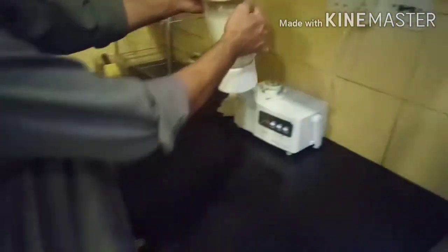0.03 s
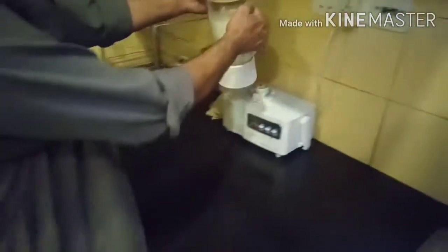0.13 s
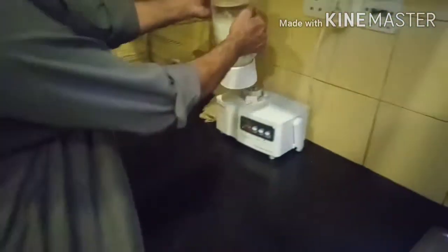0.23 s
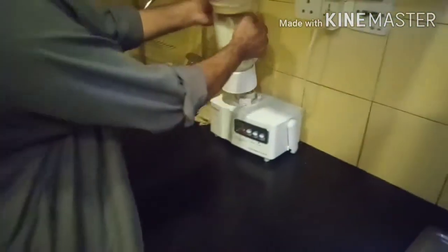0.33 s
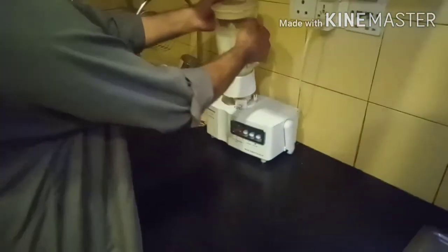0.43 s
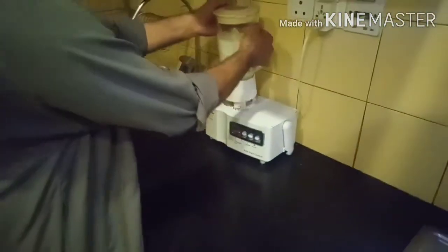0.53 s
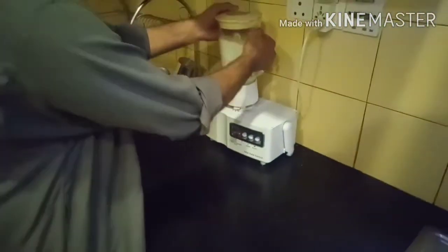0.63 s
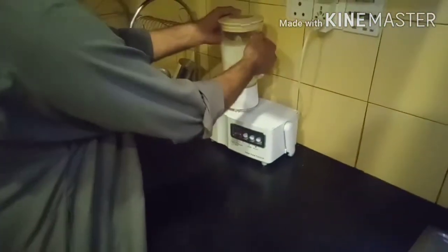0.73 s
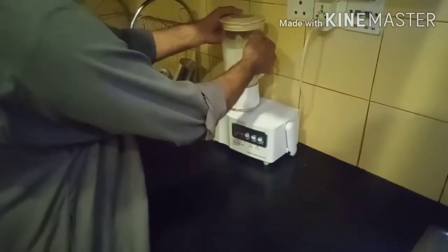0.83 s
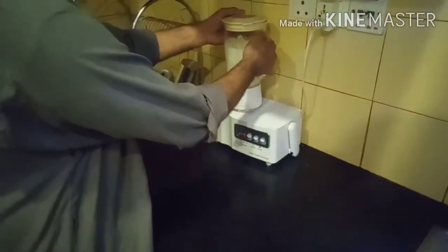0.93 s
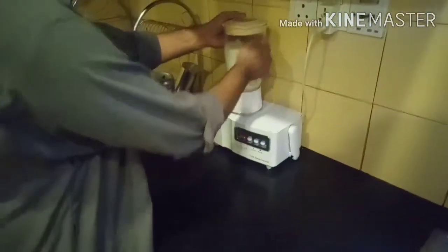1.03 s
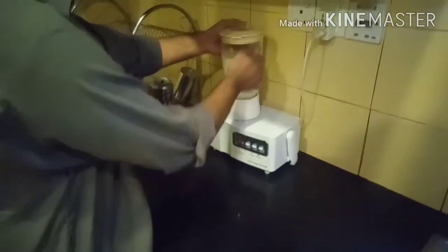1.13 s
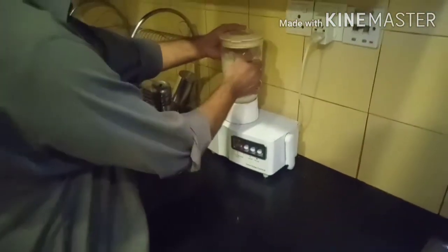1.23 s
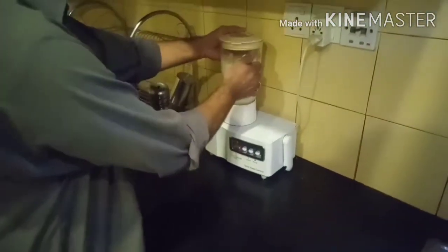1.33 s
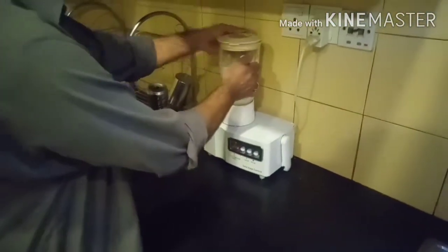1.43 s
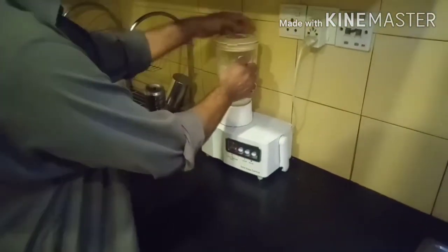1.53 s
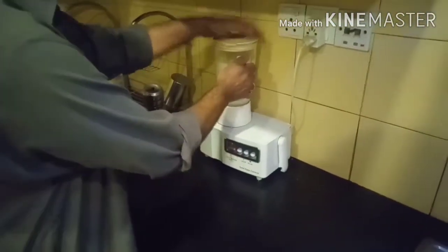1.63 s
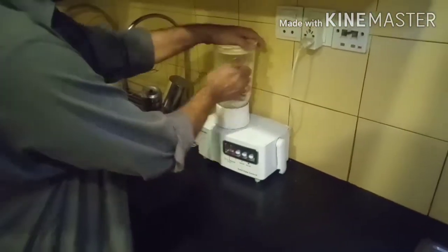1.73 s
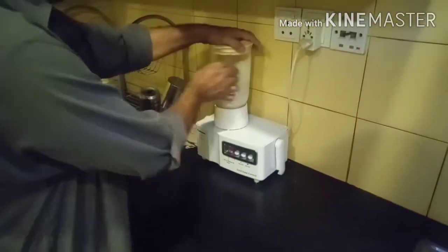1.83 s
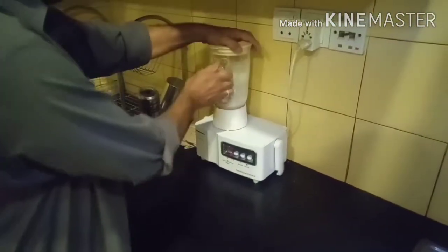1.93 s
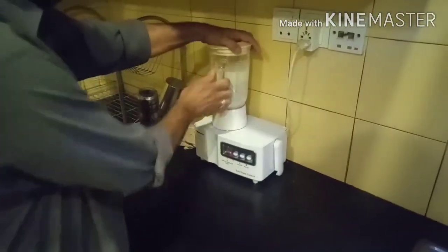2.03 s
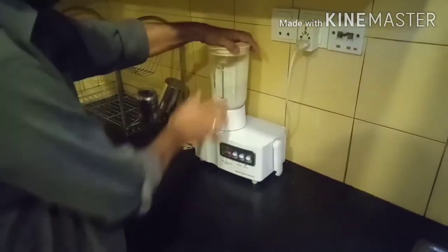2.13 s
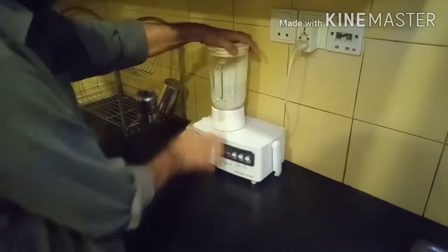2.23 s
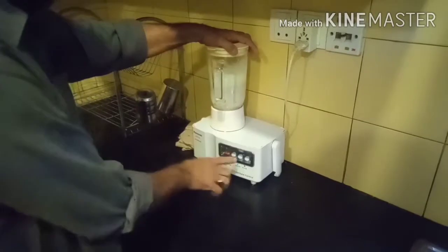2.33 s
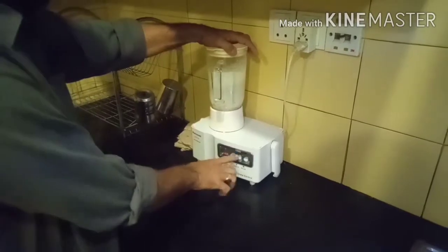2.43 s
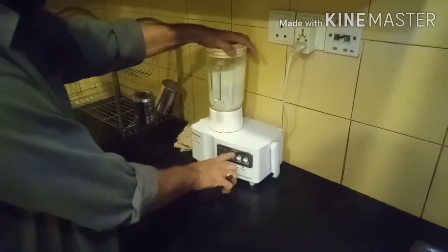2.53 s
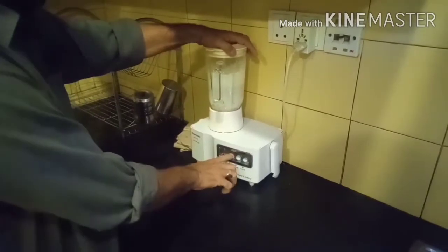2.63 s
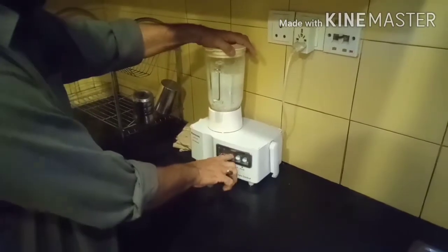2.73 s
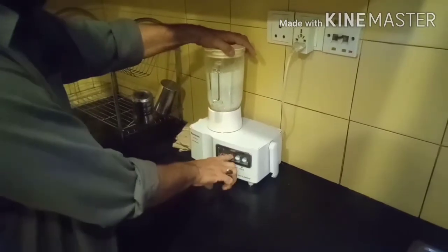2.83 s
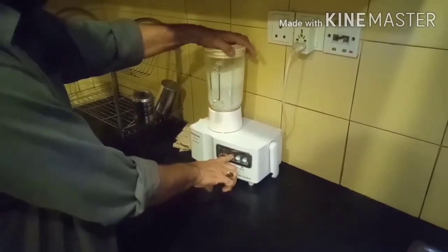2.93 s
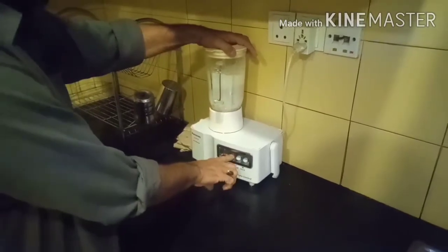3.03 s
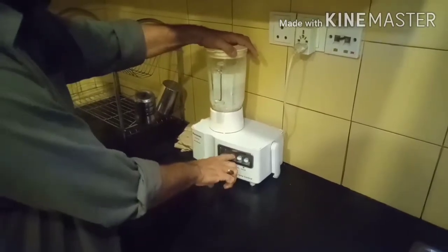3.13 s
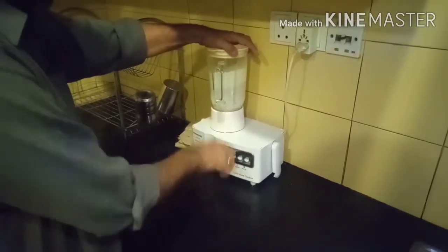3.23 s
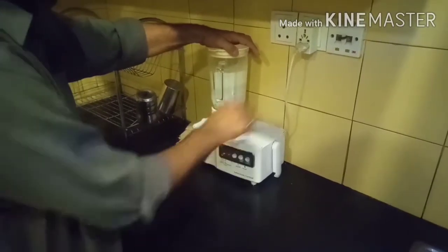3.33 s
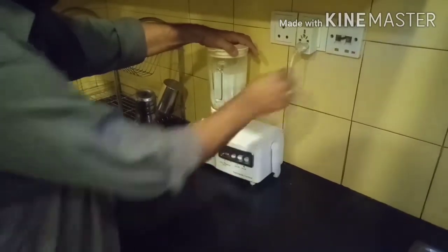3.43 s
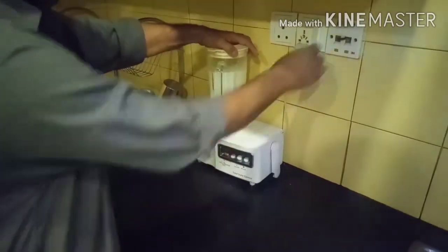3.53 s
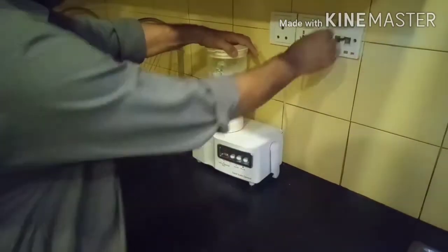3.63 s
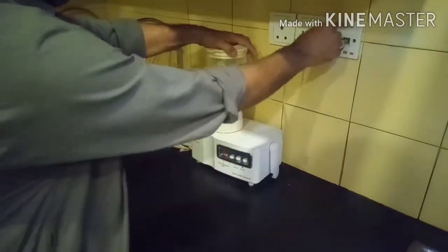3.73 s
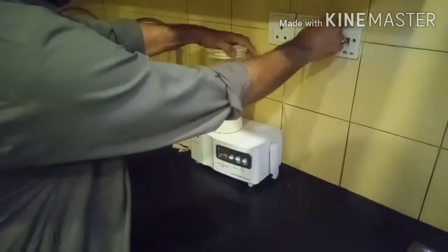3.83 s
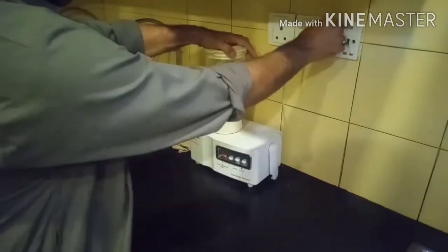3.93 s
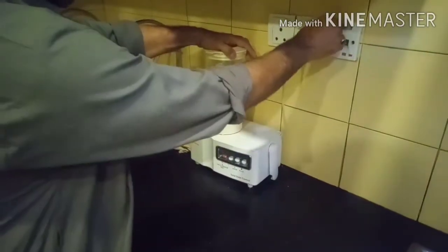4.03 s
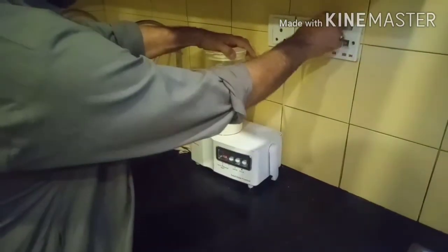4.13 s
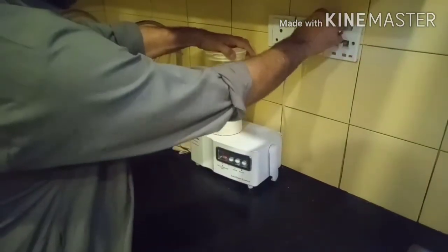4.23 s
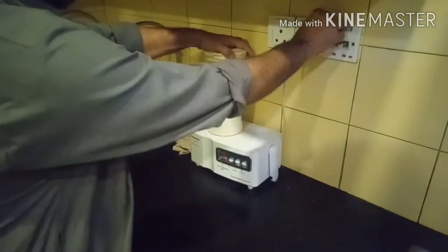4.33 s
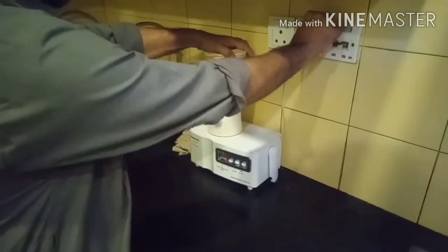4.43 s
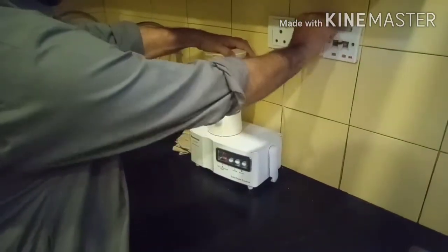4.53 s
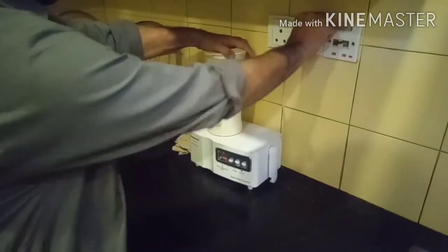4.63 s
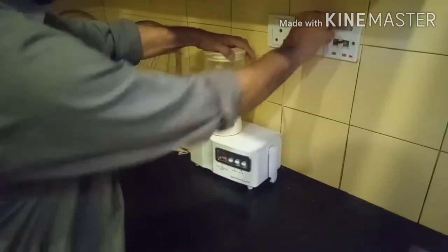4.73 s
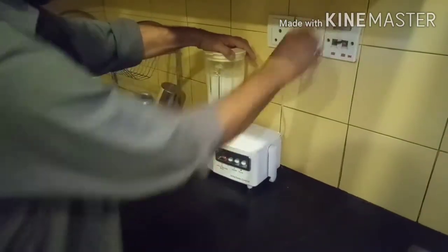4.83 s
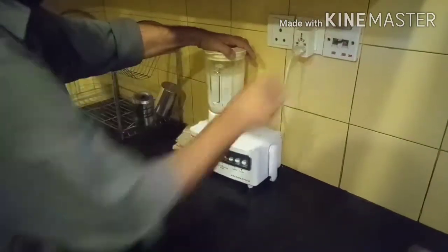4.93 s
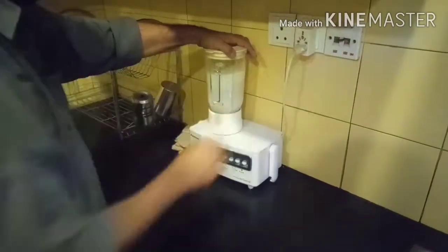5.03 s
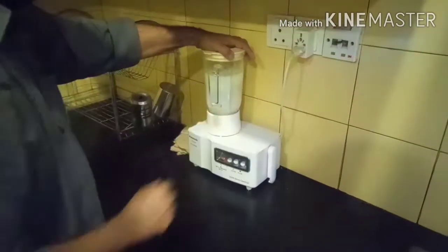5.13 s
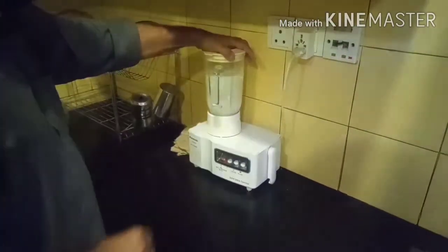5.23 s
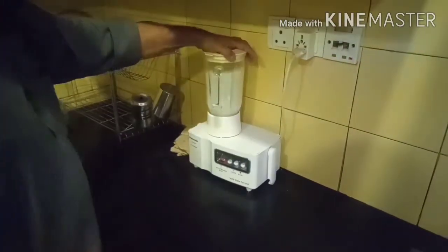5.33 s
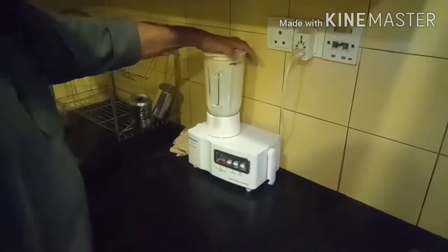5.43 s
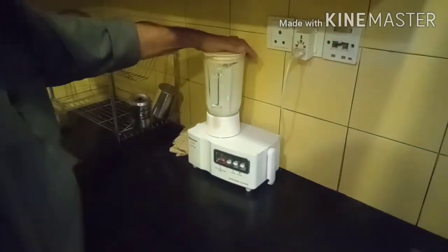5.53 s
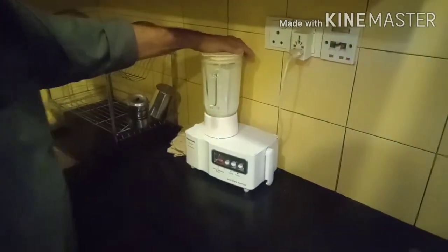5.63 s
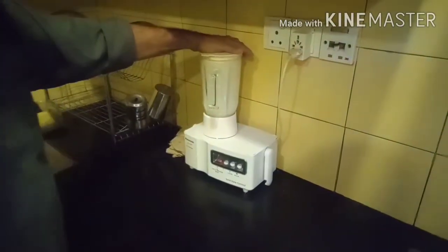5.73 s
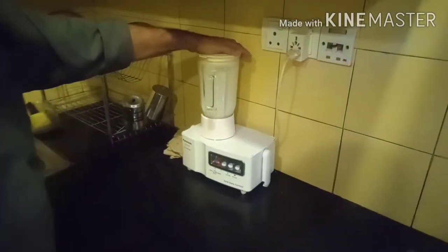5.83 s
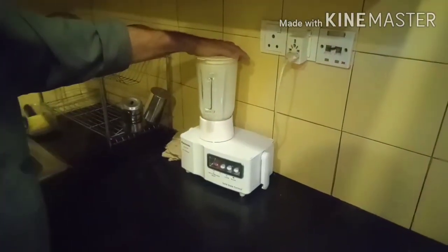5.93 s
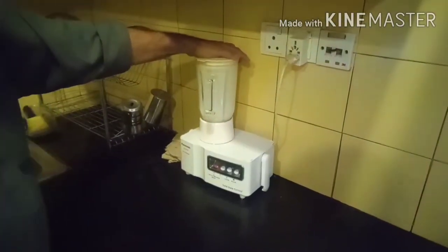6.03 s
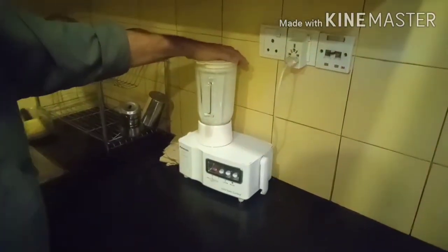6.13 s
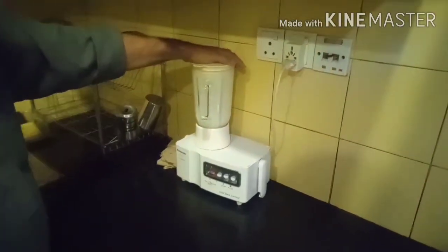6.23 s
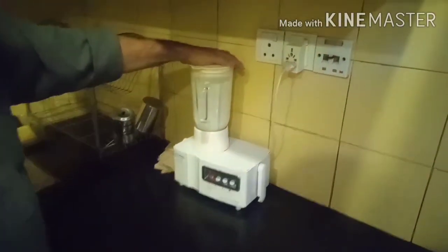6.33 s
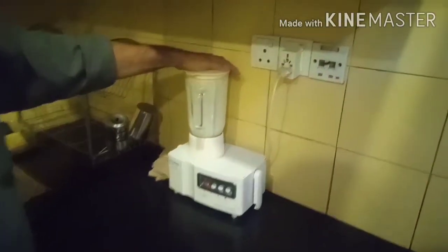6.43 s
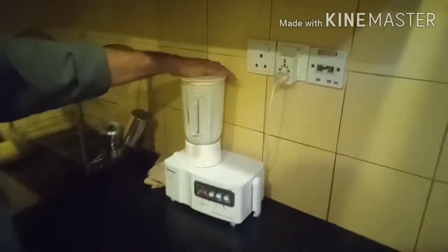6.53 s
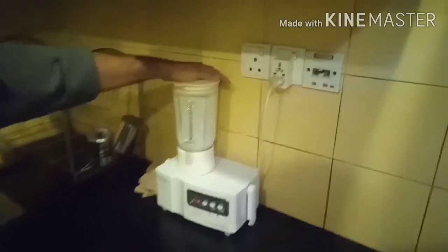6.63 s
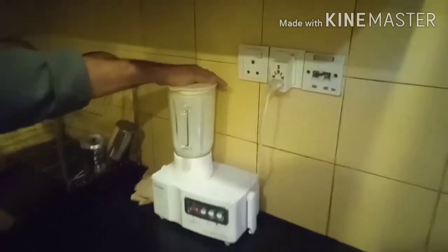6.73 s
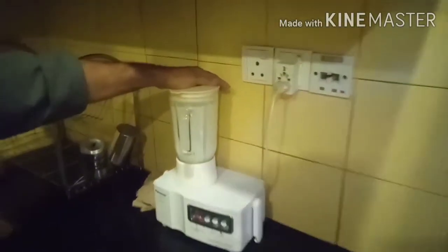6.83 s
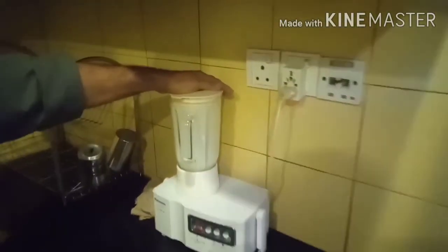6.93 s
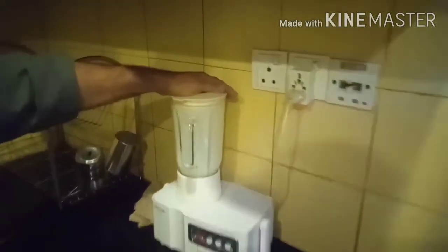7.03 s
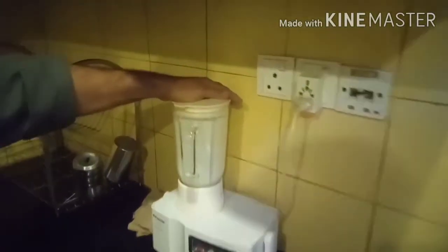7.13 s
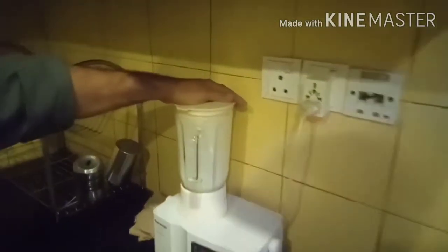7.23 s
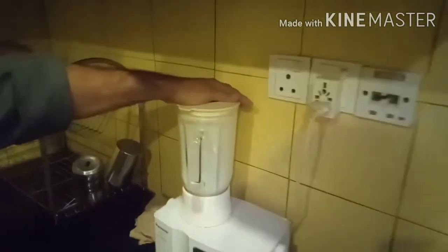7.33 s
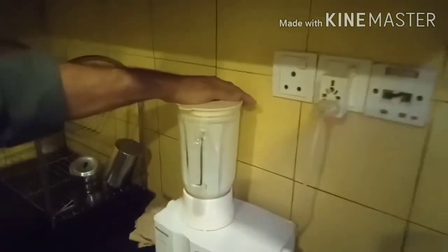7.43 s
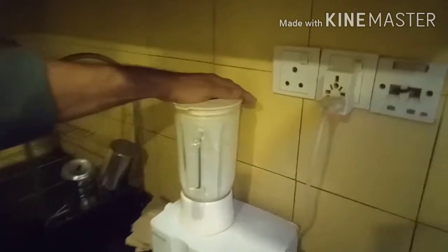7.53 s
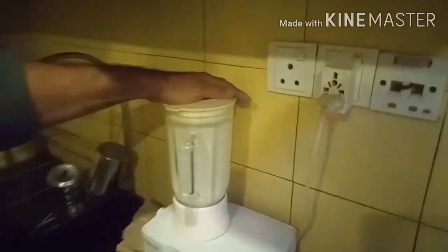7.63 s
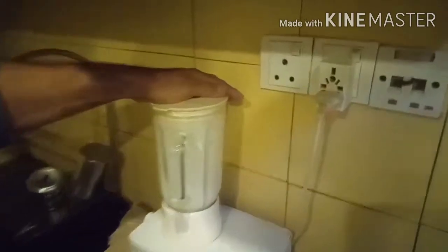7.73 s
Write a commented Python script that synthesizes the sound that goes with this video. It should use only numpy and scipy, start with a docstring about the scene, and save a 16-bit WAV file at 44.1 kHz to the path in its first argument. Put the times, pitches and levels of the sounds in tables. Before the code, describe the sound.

After a few plastic knocks and clicks in a small kitchen, a blender snaps on and runs with a humming, churning roar.

```python
"""A small tiled kitchen. A plastic blender jar is twisted onto its base and chatters home;
speed buttons click, then the wall switch snaps. The mains motor starts at once: its housing
roars and hums, its brushes crackle in step with the mains and then settle, and the blades churn
a wet mix whose hiss climbs as it thins. The walls answer briefly over a faint, steady room tone."""
import sys
import numpy as np
from scipy import signal
from scipy.fft import rfft, irfft, next_fast_len
from scipy.io import wavfile
from scipy.ndimage import map_coordinates

SR = 44100
rng = np.random.default_rng(int(sys.argv[2]) if len(sys.argv) > 2 else 0)


def waveform_to_disk(signal):
    """Save audio, clipped to [-1, 1], as 16-bit WAV at the path in sys.argv[1]."""
    frames = np.transpose(np.atleast_2d(signal))
    scaled = np.clip(frames, -1, 1) * 32767
    samples = np.round(scaled).astype(np.int16)
    wavfile.write(sys.argv[1], SR, samples)


N = 342657
MAINS_HZ, MOTOR_START_S = 50, 4.538

# The drag of the mix, heard as roar. Each row: time in seconds, load in dB (-29 is usual).
LOAD = [(4.55, -29.5), (4.65, -26), (4.8, -28.5), (5.6, -28), (5.85, -31.5), (6.08, -28), (6.28, -34),
        (6.4, -32.5), (6.55, -34.5), (6.85, -34.5), (6.95, -29.5), (7.35, -27.5), (7.55, -29.5),
        (7.77, -26.5)]
# How hard the blades whip, heard as hiss. Each row: time in seconds, churn in dB (-21 is usual).
CHURN = [(4.55, -24.5), (4.68, -24.5), (5.08, -27), (5.2, -24), (5.4, -24), (5.5, -20), (5.9, -21),
         (6.04, -20), (6.22, -22), (6.85, -21.5), (7.3, -20), (7.77, -19)]
# The vortex opening. Each row: time in seconds, roar centre in Hz, hiss centre in Hz.
VORTEX = [(4.55, 803, 3370), (5.3, 820, 3320), (5.6, 826, 3980), (6.1, 850, 4330), (6.9, 850, 4200),
          (7.4, 735, 3700), (7.77, 700, 4060)]
def blender():
    """Motor, brushes and blades ride a shifting load."""
    load_db = curves(LOAD)[0] + 29
    churn_db = curves(CHURN)[0] + 21
    roar_hz, hiss_hz = curves(VORTEX)
    drive = motor(load_db, churn_db, roar_hz) + brushes(load_db)
    return spin_up() * (drive + blades(load_db, churn_db, hiss_hz))

def spin_up():
    """The motor's sound fades in a moment after the switch closes."""
    return 1 - np.exp(-np.maximum(clock() - MOTOR_START_S, 0) / 0.0091)

# Tone of the low rumble and the housing's roar. Each row: frequency in Hz, EQ gain in dB.
RUMBLE_EQ = [(25, -45), (55, -17), (85, -21), (125, -12), (160, -5), (220, -7), (255, 0.5), (285, -1),
             (325, -9.5), (430, -10.5), (700, -35)]
HOUSING_EQ = [(300, -27), (440, -13.5), (540, -4), (595, -5), (675, 1), (710, -3), (760, 2), (795, -6.5),
              (840, -2), (950, -2), (1050, -6), (1300, -16.5), (2000, -52)]
def motor(load_db, churn_db, roar_hz):
    """The motor shakes its housing, louder under load."""
    rumble = amp(-40 + .2 * churn_db) * coloured(noise(), RUMBLE_EQ)
    shaking = coloured(noise() * amp(2.04 * wobble(120)), HOUSING_EQ)
    return rumble + amp(-29.5 + load_db) * swept(shaking, roar_hz, lift_db=7, octaves=0.17)

# Tone of the wet slosh and the grit. Each row: frequency in Hz, EQ gain in dB.
SLOSH_EQ = [(250, -38), (900, -11.5), (1240, 2), (1440, -3), (1590, -6.5), (1720, -3), (1860, 1.5),
            (2180, 2), (2330, -1.5), (2900, 2.5), (4000, -15), (7000, -44)]
GRIT_EQ = [(900, -40), (2400, -14), (2900, -4), (3700, 2), (4150, -2), (4400, 2), (4600, -6.5), (5350, -5),
           (5850, -10.5), (6250, -8), (7300, -10), (8800, -20), (12500, -32), (15500, -47)]
def blades(load_db, churn_db, hiss_hz, bits_per_s=48):
    """Dense tiny impacts in the mix hiss and slosh, while hard bits are flung at the jar."""
    surge = amp(wobble(60) + 0.89 * wobble(260))
    liquid = noise() * amp(0.46 * wobble(150)) * np.sqrt(surge)
    slosh = amp(-29.5 + .5 * load_db) * coloured(liquid, SLOSH_EQ)
    bits = unit((rng.random(N) < bits_per_s / SR) * (2 * rng.random(N) - 1))
    grit = coloured(noise() * amp(wobble(1000)) * surge + amp(-21) * bits, GRIT_EQ)
    hiss = amp(-22 + churn_db + lumps()) * swept(grit, hiss_hz, lift_db=5.5, octaves=0.42)
    return slosh + hiss + jar_rings() * surge

# Lumps caught by the blades. Each row: time in seconds, length in seconds, nominal lift in dB.
LUMPS = [(5.138, 0.011, 6), (5.167, .04, 5), (5.281, 0.014, 5), (5.34, .012, 6), (5.564, 0.04, 2.5)]
def lumps():
    """Each lump lifts the hiss at once and is ground away; in dB."""
    return sum(db * turn(s, .002) * bell(s, length_s) for s, length_s, db in LUMPS)

# Resonances of jar and housing. Each row: pitch in Hz, width in Hz, level in dB with a lumpy mix,
# level in dB with a smooth mix, time of the change in seconds.
JAR_RINGS = [(255, 50, -50.5, -42.5, 6.8), (752, 71, -44.5, -39, 6.97), (1583, 74, -39.5, -50.5, 6.28),
             (2543, 53, -36, -46, 5.57), (3750, 130, -41.5, -36, 6.1), (3930, 45, -51, -33, 6.34),
             (4360, 80, -42, -31.5, 6.06), (4756, 120, -46, -35, 5.24), (5120, 140, -52, -35, 5.7),
             (5400, 260, -49, -29.5, 7.16), (6150, 100, -52, -38, 6.26), (6900, 79, -43, -55, 6.1)]
def jar_rings():
    """The resonances swell at random; one after another they come or go as the mix thins."""
    out = np.zeros(N)
    for hz, width, lumpy_db, smooth_db, s in JAR_RINGS:
        level_db = lumpy_db + (smooth_db - lumpy_db) * turn(s, 0.065)
        out += amp(level_db + 2.2 * wobble(7)) * narrow(hz, width)
    return out

# Tone of sparking and of settled brushes. Each row: frequency in Hz, EQ gain in dB.
CRACKLE_EQ = [(700, -39), (4000, 0), (5800, -8), (6500, 2.5), (7000, 3.5), (7700, -4), (8800, -13),
              (10000, -10.5), (11000, -8), (12000, -13.5), (13500, -16), (15500, -28)]
GLIDE_EQ = [(6000, -20), (8500, 3), (9200, -5), (10000, -1), (10800, -2), (12600, 8), (14000, -10),
            (15500, -15)]
def brushes(load_db):
    """The brushes spark and crackle at first, then settle to a mostly smooth hiss."""
    settled = turn(s=6.14, span_s=.025)
    flare = unit(0.44 + sparks(scatter_db=8, jitter_s=.0007, life_s=0.004))
    sparking = amp(-29.5 + 0.27 * wobble(10)) * (1 - .9 * settled)
    crackle = sparking * coloured(noise() * flare, CRACKLE_EQ)
    gliding = amp(-50) * settled * coloured(noise(), GLIDE_EQ)
    return amp(0.45 * load_db) * (crackle + gliding)

def sparks(scatter_db, jitter_s, life_s):
    """Brush sparks flare at each crest of the mains current, each at its own strength."""
    crests = np.arange(0, N / SR, 1 / (2 * MAINS_HZ))
    late, size = rng.uniform(-1.3, 1, (len(crests), 2)).T
    at = np.clip((crests + jitter_s * late) * SR, 0, N - 1).astype(int)
    flares = np.bincount(at, amp(scatter_db * size), N)
    return unit(signal.lfilter([1], [1, -np.exp(-1 / (life_s * SR))], flares))

# The hum's partials. Each row: multiple of the mains frequency, level in dB.
MOTOR_HUM = [(2, -46), (3, -48.5), (4, -60), (5, -54)]
def hum():
    """The motor's iron vibrates at multiples of the mains."""
    return sum(amp(db + 1.5 * wobble(5.2)) * np.sin(2 * np.pi * (k * MAINS_HZ * clock() + rng.random()))
               for k, db in MOTOR_HUM)

# Jar against base. Each row: start in seconds, strength in dB, body offset in dB,
# treble offset in dB, chatter length in seconds.
KNOCKS = [(0.6724, -37, -11, -5, .004), (0.6893, -30, -19, -17, .004), (0.7544, -27, -5, -15, .004),
          (0.7654, -26, -1.5, -7, 0.0051), (0.7931, -26, -4, -15, .004), (0.8255, -31, -7, -13, .004),
          (1.112, -31, -9, -5.5, 0.0073), (1.1273, -33, -15, -14, .004), (1.1544, -27, -11, -19, .004),
          (1.1626, -20.5, -4.5, -17, 0.0089), (1.1802, -17, -4.5, -13, 0.016), (1.2074, -24, 0, -16, .006),
          (1.2304, -25, -2, -11, 0.0096), (1.7504, -29, -13, -13, .004), (1.792, -19.5, -6, -10.5, 0.033),
          (1.8304, -22, -5, -11, 0.013), (1.8627, -29, -4, -9, .004), (1.8881, -13, 2.5, -5.5, .015),
          (1.9124, -20.5, -1, -4, 0.026), (1.9511, -18, -6.5, -7, .044)]
# Tone of a knock. Each row: frequency in Hz, EQ gain in dB.
KNOCK_EQ = [(200, -7), (280, -7), (400, -17), (520, -7), (650, -4.5), (800, 3), (950, -3), (1150, -13),
            (1300, -8.5), (2290, -9), (3680, -7.5), (5590, -18.5), (7200, -13.5), (8400, -26.5),
            (11000, -26.5), (15500, -40)]
# The ring of jar and housing. Each row: pitch in Hz, relative level in dB, T60 in seconds.
PLASTIC_MODES = [(550, -1.5, 0.039), (677, 4, 0.071), (796, 1, 0.05), (897, 1, 0.089), (1216, -11, 0.077),
                 (1590, -10, 0.077), (1850, -7.5, 0.055), (2570, -7.5, 0.07), (2910, -12, .06),
                 (3780, -17, .06), (4420, -8, .05), (7050, -19, 0.044)]
def jar():
    """The jar knocks and chatters onto its coupling."""
    return contacts(chatter(KNOCKS), KNOCK_EQ, PLASTIC_MODES, attack_s=0.00033,
                    band_t60_s=(0.051, 0.066, 0.038), band_db=(-2.5, -5.5, -0.5), ring_db=-10.5)

def chatter(knocks, count=5, gap_s=.0083, fall_db=11):
    """Each knock skips on in quick contacts that hold their strength, then die away."""
    hits = []
    for s, db, body_db, treble_db, length_s in knocks:
        gaps = gap_s * np.exp(.1 * rng.standard_normal(count))
        for delay in np.cumsum(gaps) - gaps[0]:
            loss_db = min(fall_db * (delay / length_s) ** 3, 80)
            hits.append((s + delay, db - loss_db, body_db, treble_db))
    return hits

def contacts(hits, eq, modes, attack_s, band_t60_s, band_db, ring_db):
    """Hard plastic contacts: a crack that dies faster in the treble, and the struck part's short ring."""
    out, t = np.zeros(N), np.arange(SR // 4) / SR
    hz, mode_db, mode_t60 = np.transpose(modes)
    partials = np.sin(2 * np.pi * hz[:, None] * t) * decay(t, mode_t60[:, None])
    bands_hz = [(220, 1300), (1300, 6000), (6000, 16000)]  # body, mid, treble
    loudest_db = max(hit[1] for hit in hits)
    for s, db, body_db, treble_db in hits:
        softness = min(amp(loudest_db - db) ** 2, 5)  # light touches slide in, hard blows snap
        rise = 1 - np.exp(-t / (attack_s * softness))
        burst = rng.standard_normal(len(t))
        gains = amp(band_db) * amp([db + body_db, db, db + treble_db])
        for (lo, hi), gain, t60 in zip(bands_hz, gains, band_t60_s):
            band = unit(filtered(burst, lambda f: amp(along(eq, f)) * (f > lo) * (f < hi)))
            add(out, s, gain * band * rise * decay(t, t60))
        weight_db = np.where(hz < bands_hz[0][1], body_db, 0)  # heavy blows reach the low modes
        strength = amp(mode_db + weight_db + 2 * rng.standard_normal(len(hz)))
        ring = (strength * rng.choice([-1, 1], len(hz))) @ partials
        add(out, s, amp(db + ring_db) * ring * rise)
    return out

# Speed buttons, then the wall switch, touched and thrown.
# Each row: start in seconds, strength in dB, body offset in dB, treble offset in dB.
BUTTONS = [(2.6938, -28, -10, -14), (2.7756, -17, -6.5, -18), (2.9437, -27.5, -10, -20),
           (3.1817, -30, -19, -21), (3.1924, -32.5, -16, -8)]
FLICKS = [(4.2722, -34, -11, -13), (4.5196, -13.5, -33, -5.5)]
# Tone of a click. Each row: frequency in Hz, EQ gain in dB.
CLICK_EQ = [(300, -29), (1220, -8), (1810, -2), (2600, 0), (3100, 0.5), (3550, 4), (4000, 1), (4600, -9.5),
            (5400, -14), (6400, -2), (7100, -10), (8700, -19), (11000, -19), (15500, -29)]
# Switch springs and plates. Each row: pitch in Hz, relative level in dB, T60 in seconds.
SWITCH_MODES = [(2520, -3, 0.05), (3500, 8, 0.038), (3890, -1, 0.053), (4600, 6, .025), (6400, -6, 0.046),
                (6970, -8, 0.037)]
def switches():
    """Dry button clicks on the housing, and the sharper snap of the wall switch."""
    buttons = contacts(BUTTONS, CLICK_EQ, PLASTIC_MODES, attack_s=.0001,
                       band_t60_s=(0.075, 0.045, 0.038), band_db=(-8, -4, -1), ring_db=-16.5)
    wall = contacts(FLICKS, CLICK_EQ, SWITCH_MODES, attack_s=.0001,
                    band_t60_s=(0.06, 0.048, 0.036), band_db=(-6, -5.5, -1), ring_db=-13)
    return buttons + wall

# Soft bumps on the counter. Each row: start in seconds, strength in dB.
BUMPS = [(0.764, -29.5), (0.904, -29), (1.065, -29), (1.179, -21.5), (1.754, -32.5), (1.798, -22),
         (1.892, -23.5)]
# The base on its feet. Each row: pitch in Hz, relative level in dB, T60 in seconds.
FEET_MODES = [(109, -12, 0.12), (212, -2.5, 0.077), (259, 0, 0.088)]
def base(thud_s=1.175, thud_rise_s=.035):
    """The base rocks on its rubber feet, and the counter thuds under the weight of the push."""
    out, t = np.zeros(N), np.arange(SR // 2) / SR
    shake = sum(amp(db) * np.sin(2 * np.pi * hz * t) * decay(t, t60) for hz, db, t60 in FEET_MODES)
    for s, db in BUMPS:
        add(out, s, amp(db) * shake * (1 - np.exp(-t / 0.0029)))
    swell = t / thud_rise_s * np.exp(1 - t / thud_rise_s)
    add(out, thud_s, amp(-43) * swell * narrow(58, 36)[:len(t)])
    return out

# Tone of the cloth. Each row: frequency in Hz, EQ gain in dB.
CLOTH_EQ = [(1500, -20), (4000, 9), (8000, 4), (12000, -5), (15500, -8)]
def sleeve():
    """A sleeve brushes past once."""
    return amp(-53) * bell(s=0.36, half_length_s=.06) * coloured(noise(), CLOTH_EQ)

# The room's decay. Each row: frequency in Hz, T60 in seconds.
KITCHEN_T60 = [(150, 0.44), (1000, 0.36), (4000, 0.28), (12000, 0.22)]
def kitchen(x):
    """The tiled walls answer with a short tail."""
    hz, t, spectra = signal.stft(rng.standard_normal(SR // 2), SR, nperseg=256)
    tail = signal.istft(spectra * decay(t, along(KITCHEN_T60, hz)[:, None]), SR, nperseg=256)[1]
    delayed = np.pad(tail, (SR // 300, 0)) / np.linalg.norm(tail)
    return signal.fftconvolve(x, delayed)[:N]

# Tone of the room's air and its faint hiss. Each row: frequency in Hz, EQ gain in dB.
AIR_EQ = [(15, -63), (25, -16), (64, -14.5), (96, -1), (164, -7), (267, -5.5), (469, -5), (614, -5),
          (666, -6), (1200, -7.5), (1300, -10), (3530, -13.5), (4750, -24.5), (6550, -31.5), (15500, -54.5)]
AIR_HISS_EQ = [(3000, -40), (5200, -10), (5900, 2.5), (7000, -2.5), (8000, -8), (9500, -32), (11600, -14),
               (13000, -27)]
# The background drone. Each row: centre in Hz, width in Hz, level in dB.
DRONE = [(96.4, 16, -60), (273.5, 61, -53.5), (1247, 36, -56.5), (3510, 770, -60)]
def room_tone():
    """Steady kitchen air with a faint drone and hiss."""
    air = amp(-43.5) * coloured(noise(), AIR_EQ)
    hiss = amp(-62.5) * coloured(noise(), AIR_HISS_EQ)
    return air + hiss + sum(amp(db) * narrow(hz, width) for hz, width, db in DRONE)

def amp(db):
    """Decibels to gain."""
    return 10 ** (np.asarray(db) / 20)

def unit(x):
    """Scale to rms 1."""
    return x / np.sqrt(np.mean(x ** 2) + 1e-20)

def clock():
    """The time of every sample."""
    return np.arange(N) / SR

def decay(t, t60):
    """A fade that loses 60 dB in t60 seconds."""
    return np.exp(-np.log(1000) * t / t60)

def bell(s, half_length_s):
    """A smooth rise and fall around time s, top 1."""
    return np.exp(-((clock() - s) / half_length_s) ** 2 / 2)

def turn(s, span_s):
    """A smooth change from 0 to 1 around time s."""
    return (1 + np.tanh((clock() - s) / (2 * span_s))) / 2

def along(points, hz):
    """Interpolate (Hz, value) points on a log axis."""
    f, values = np.transpose(points)
    return np.interp(np.log(hz + 1), np.log(f + 1), values)

def curves(rows):
    """One value per sample for each column after the time."""
    s, *columns = np.transpose(rows)
    return [np.interp(clock(), s, column) for column in columns]

def wobble(rate):
    """A smooth random curve, rate knots a second."""
    return map_coordinates(rng.standard_normal(8192), [clock() * rate], mode="wrap")

def noise():
    """Fresh white noise."""
    return rng.standard_normal(N)

def filtered(x, response):
    """x through a frequency response."""
    size = next_fast_len(len(x) + 8192)
    return irfft(rfft(x, size) * response(np.fft.rfftfreq(size, 1 / SR)), size)[:len(x)]

def coloured(x, eq):
    """x through a (Hz, dB) curve, at rms 1."""
    return unit(filtered(x, lambda hz: amp(along(eq, hz))))

def resonance(f, centre, width):
    """Causal response of one resonance."""
    return 1j * f * width / (centre ** 2 - f ** 2 + 1j * f * width)

def narrow(centre, width):
    """Noise ringing in one steep resonance, at rms 1."""
    return unit(filtered(noise(), lambda f: resonance(f, centre, 1.5 * width) ** 2))

def swept(x, centre_hz, lift_db, octaves):
    """Lift a band that follows a moving centre, at rms 1."""
    hz, t, spectra = signal.stft(x, SR, nperseg=1024)
    octaves_away = np.log2((hz[:, None] + 1) / np.interp(t, clock(), centre_hz))
    lift = amp(lift_db * np.exp(-(octaves_away / octaves) ** 2))
    return unit(signal.istft(spectra * lift, SR, nperseg=1024)[1][:N])

def add(track, s, sound):
    """Mix a sound in at time s."""
    part = track[round(s * SR):][:len(sound)]
    part += sound[:len(part)]

def scene():
    """Hands and machine in the room, in mono."""
    hands = sleeve() + jar() + base() + switches()
    machine = blender()
    reverb = kitchen(amp(-11) * (hands + machine))
    return (hands + machine + spin_up() * hum() + reverb + room_tone())[None]

def record(dry):
    """Roll off the deepest bass and cut the very top."""
    bass_hz, top_hz = 40, 15550
    def passband(hz):
        return hz ** 2 / np.hypot(hz ** 2, bass_hz ** 2) * (hz < top_hz)
    return np.array([filtered(channel, passband) for channel in dry])

dry = scene()
out = record(dry)
waveform_to_disk(out)
```